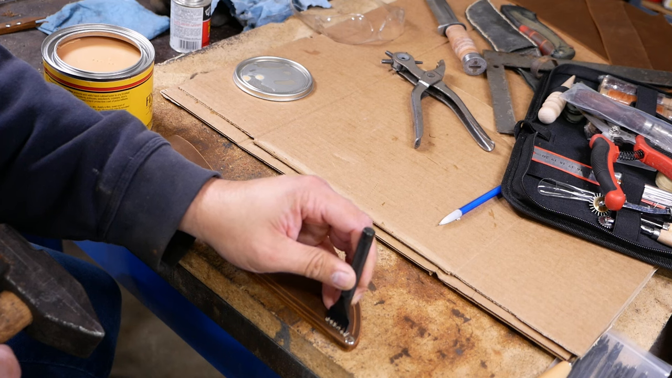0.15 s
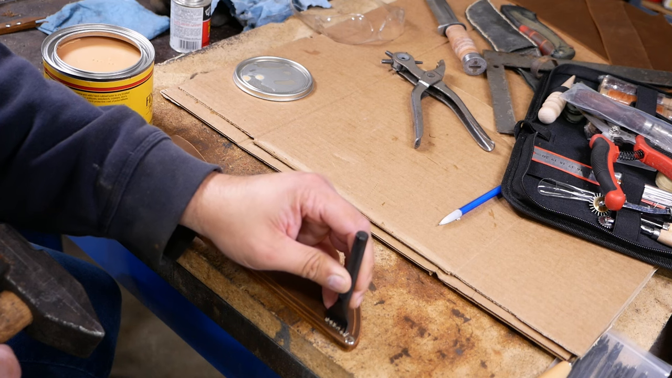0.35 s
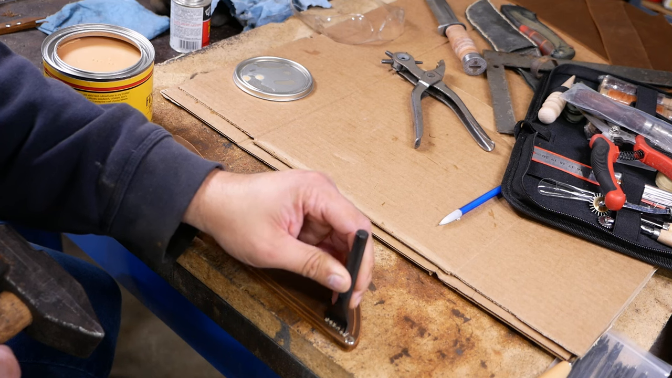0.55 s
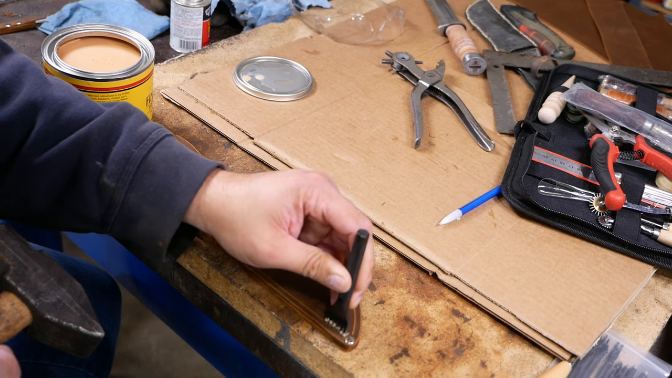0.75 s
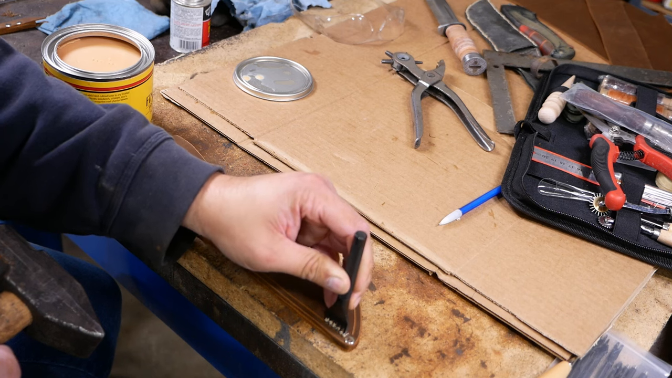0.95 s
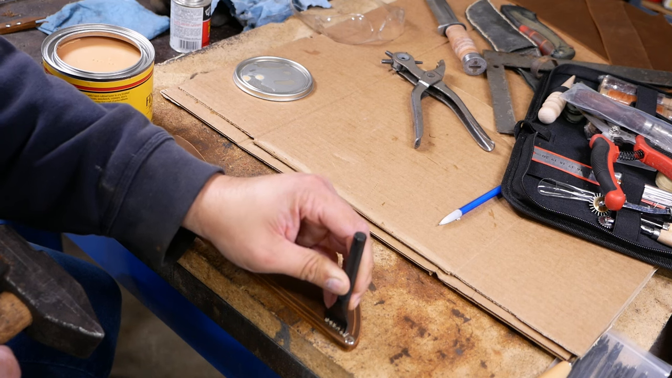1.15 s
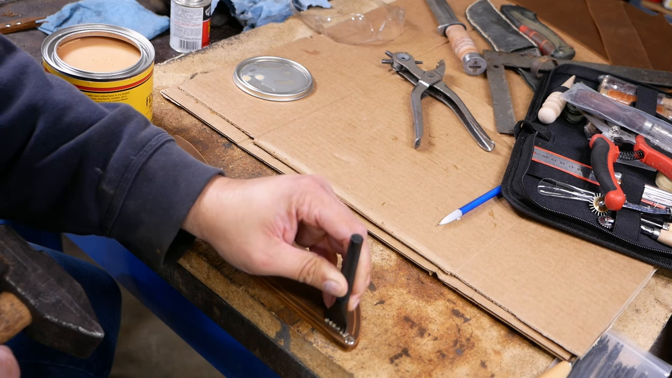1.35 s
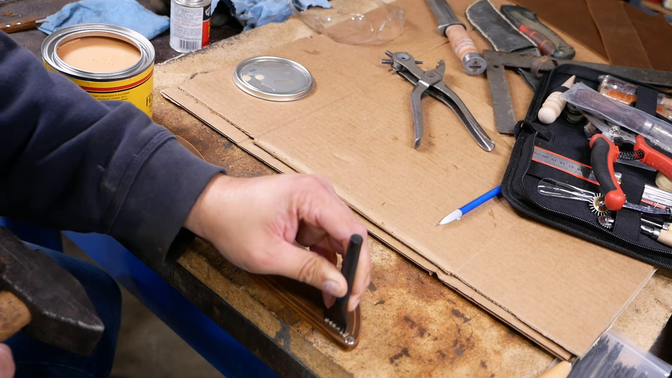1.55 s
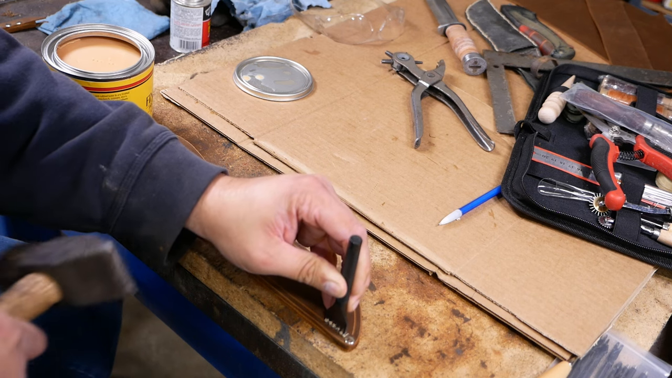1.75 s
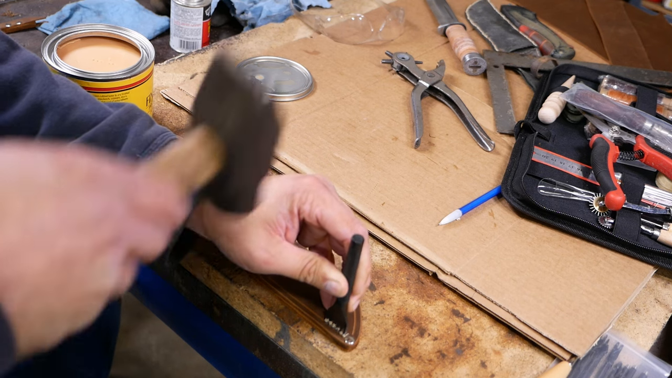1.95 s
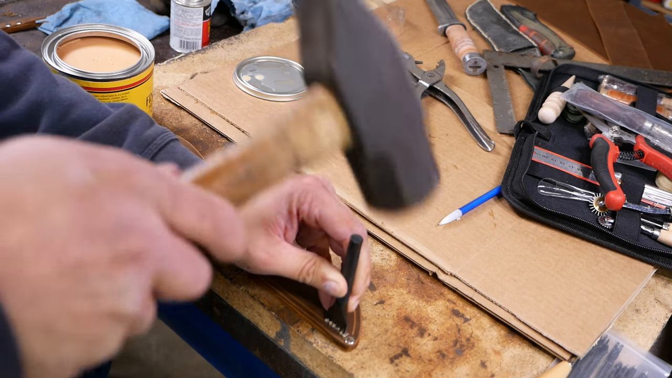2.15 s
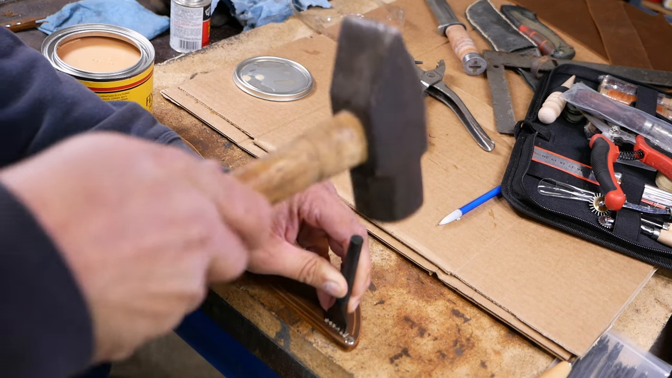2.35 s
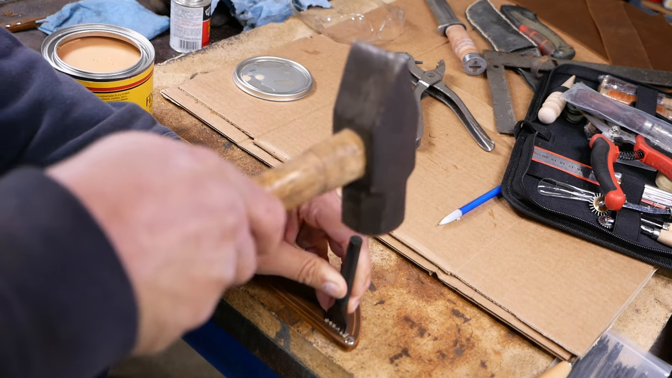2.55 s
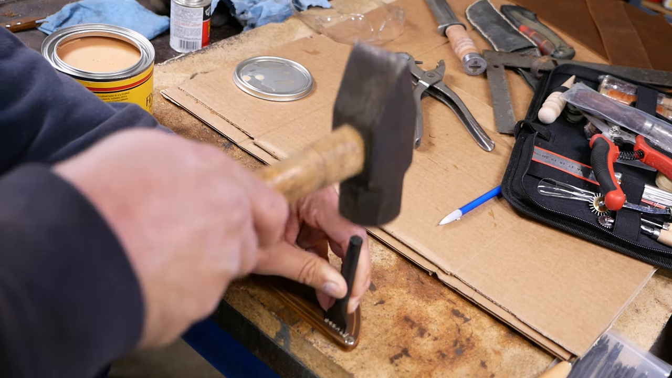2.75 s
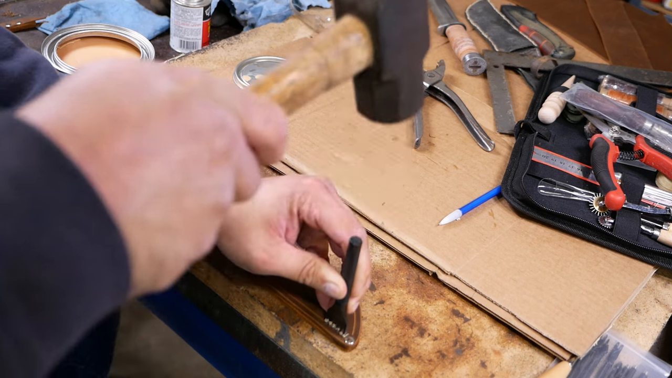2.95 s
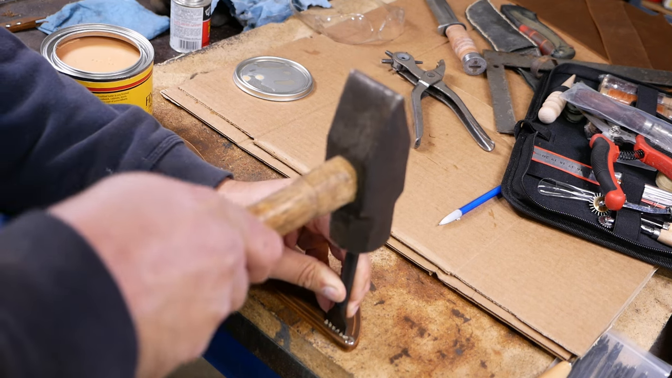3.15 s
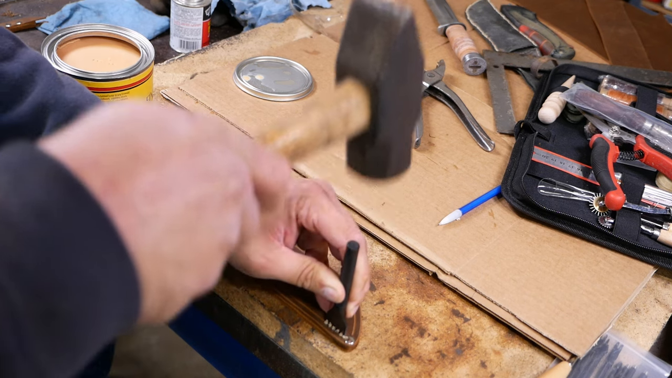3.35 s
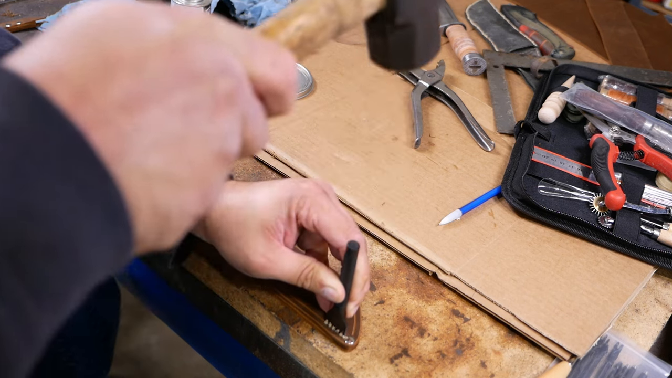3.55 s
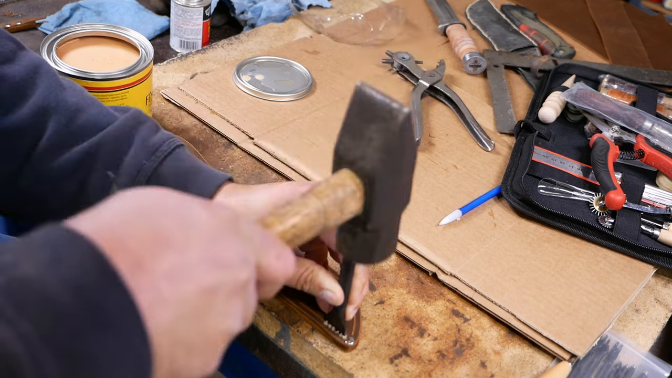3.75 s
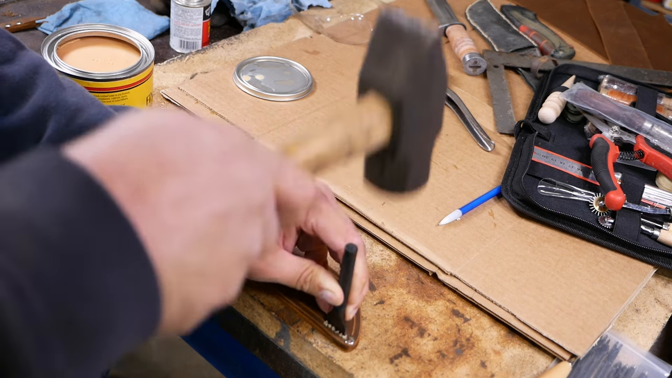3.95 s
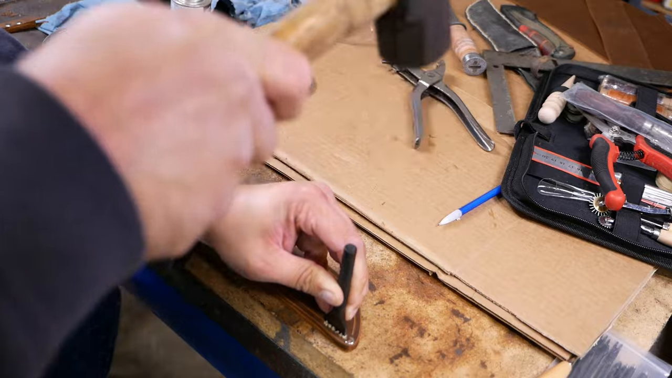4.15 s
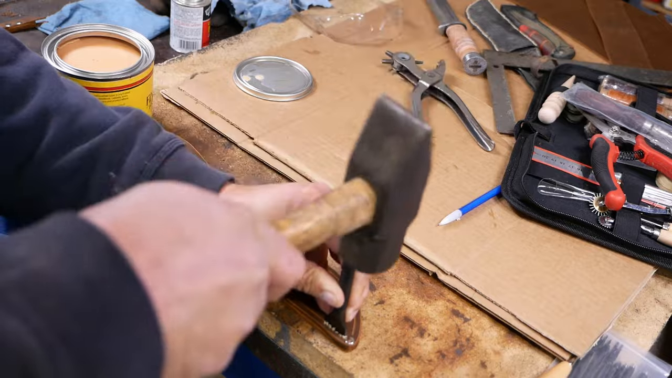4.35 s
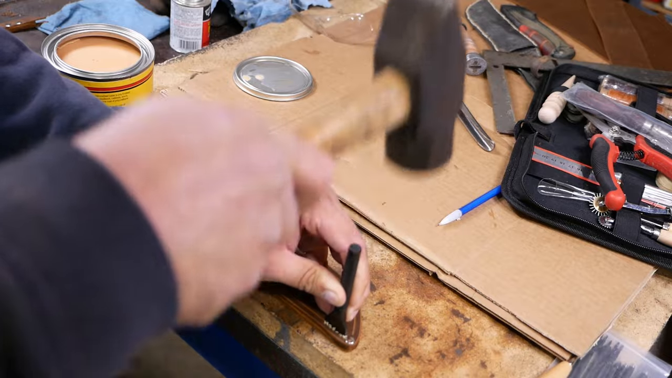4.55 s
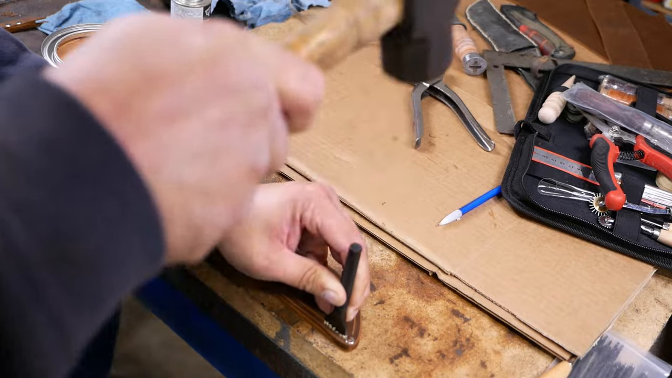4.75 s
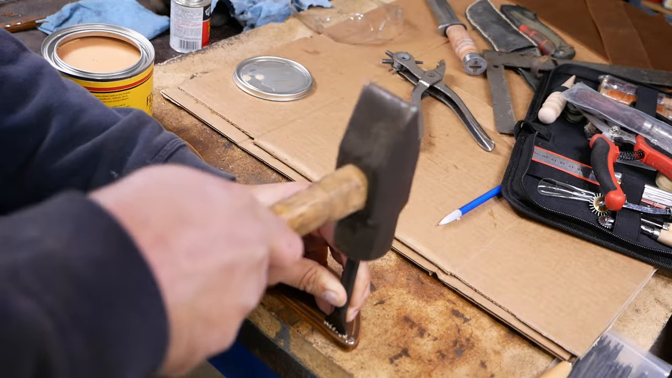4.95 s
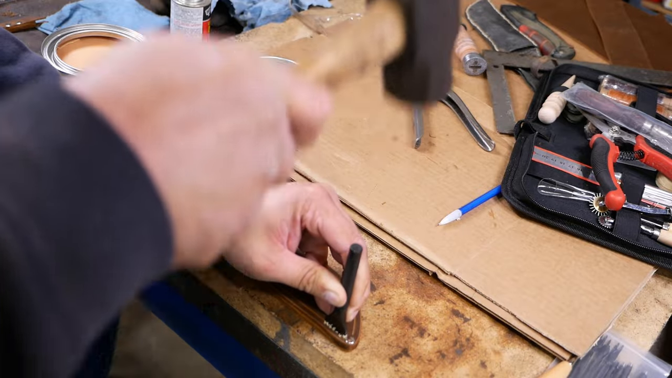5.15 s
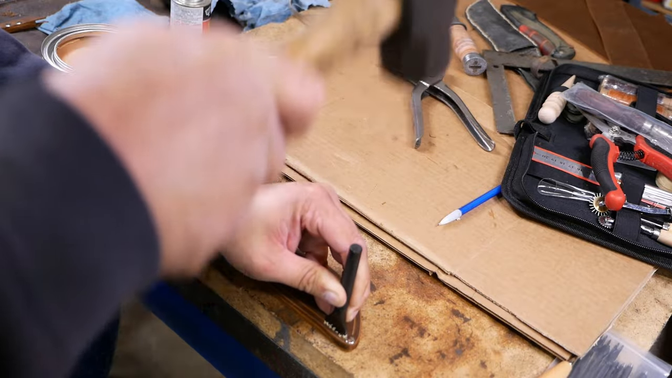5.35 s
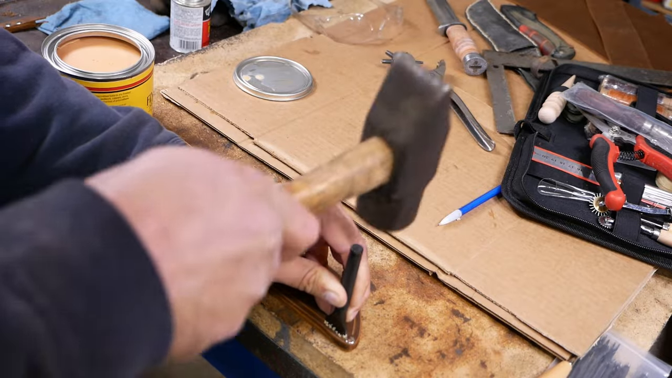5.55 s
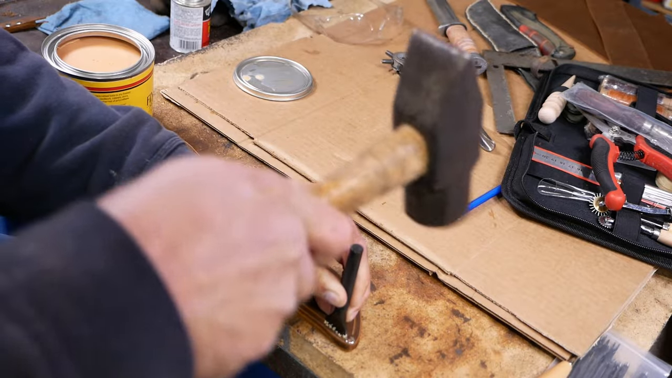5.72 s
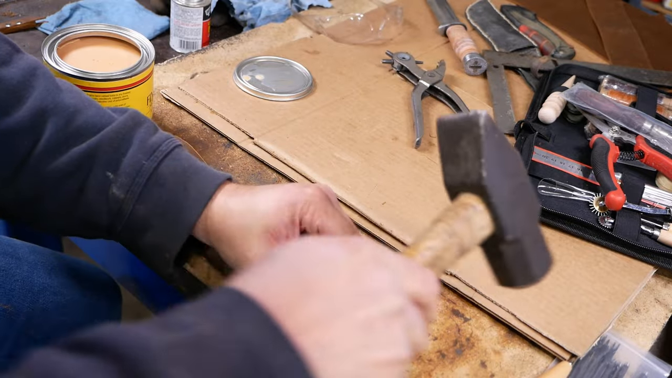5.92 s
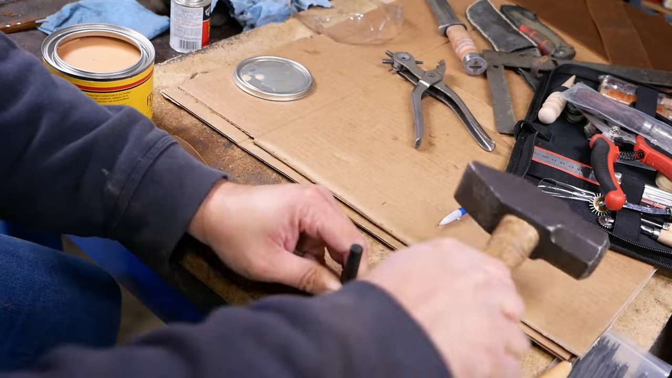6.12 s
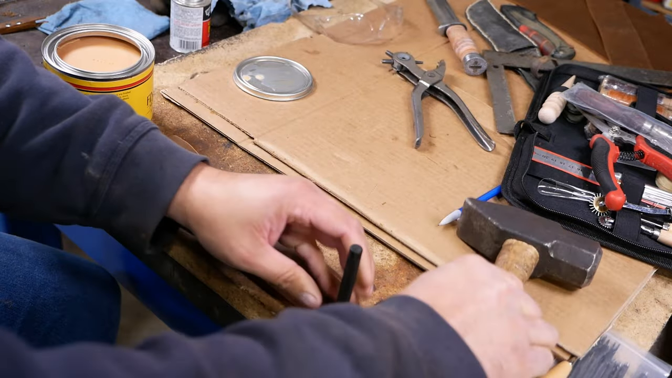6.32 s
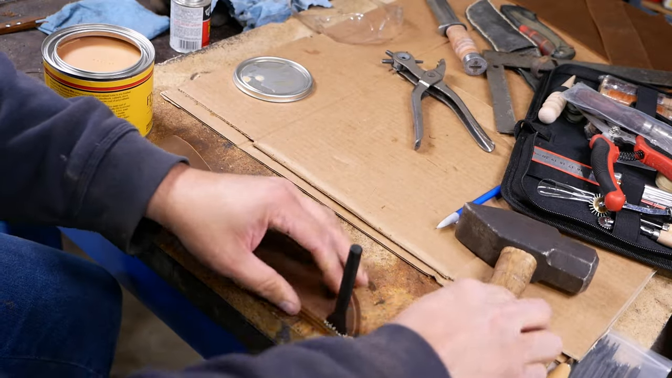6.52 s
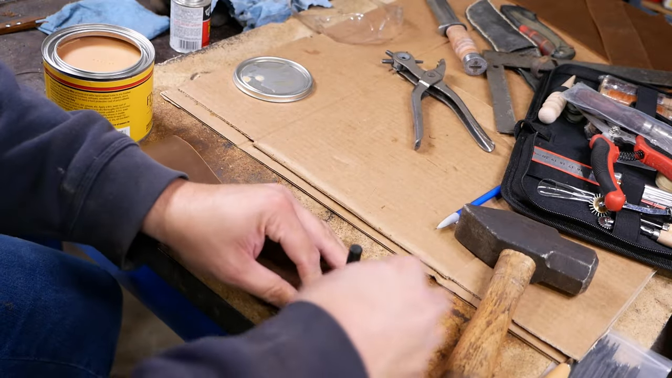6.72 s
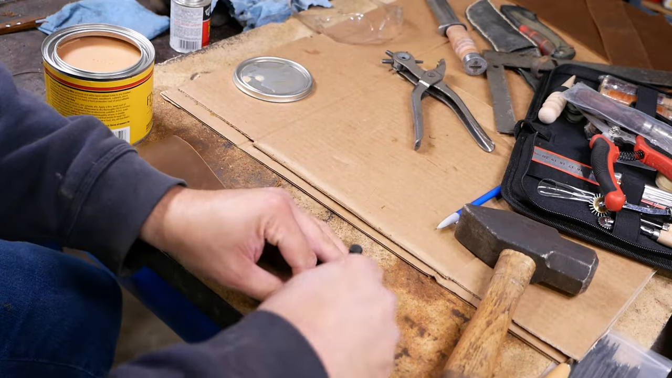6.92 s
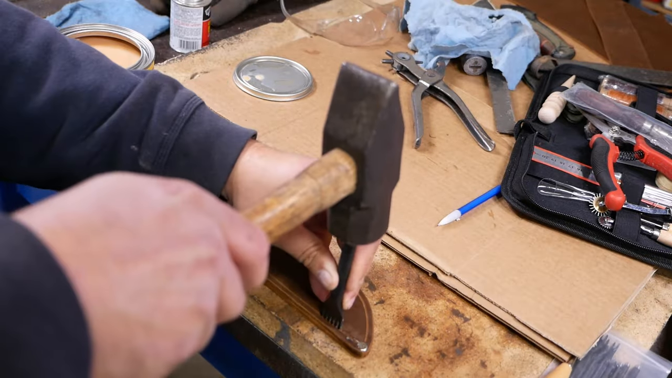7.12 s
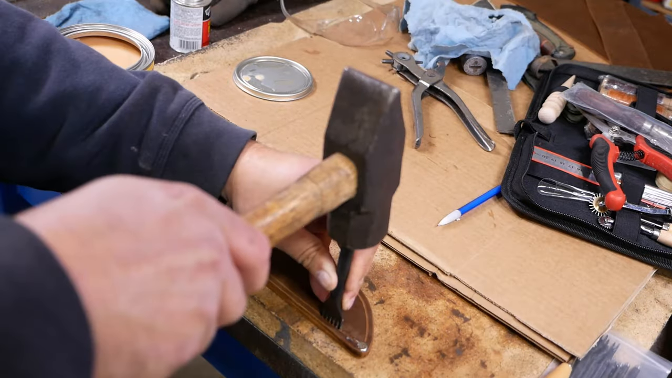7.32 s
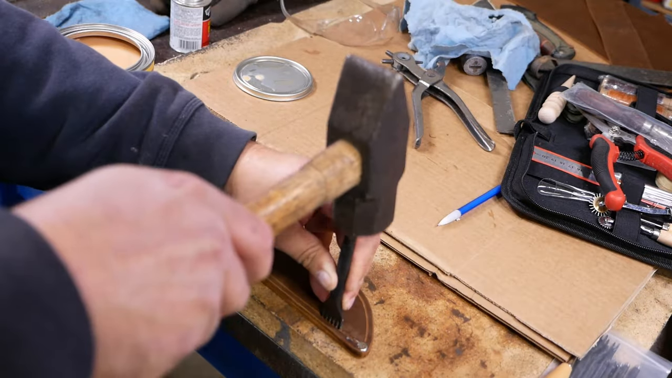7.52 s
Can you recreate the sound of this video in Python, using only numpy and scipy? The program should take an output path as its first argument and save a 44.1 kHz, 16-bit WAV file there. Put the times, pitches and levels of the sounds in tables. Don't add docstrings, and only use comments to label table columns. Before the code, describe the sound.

Five heavy hammer blows ring on a steel chisel over a wooden bench, each swelling into a long hall echo, then the hammer is laid down.

```python
import sys
import numpy as np
from scipy import signal
from scipy.fft import rfft, irfft
from scipy.io import wavfile
from scipy.ndimage import uniform_filter1d

SR = 44100
rng = np.random.default_rng(int(sys.argv[2]) if len(sys.argv) > 2 else 0)


def invert_db(level):
    return 10 ** (np.asarray(level, dtype=float) / 20)


def pcm_store(signal):
    levels = np.round(np.clip(np.atleast_2d(signal), -1, 1) * 32767)
    wavfile.write(sys.argv[1], SR, levels.astype(np.int16).T)


N = 338688
CLOCK = np.arange(N) / SR
SCENE_CHANGE_S = 7.023

# pitch_hz, level_db per Hz
AIR_COLOUR = [(12, -53.5), (20, -1.5), (77, -4.5), (113, -6), (134, -16), (204, -18.5), (222, -21),
              (248, -21.5), (485, -24), (574, -25.5), (624, -24), (1090, -24), (2460, -36), (14700, -45.5),
              (16000, -44.5)]
# pitch_hz, level_db per Hz
CLOTH_COLOUR = [(880, -33.5), (1500, -4), (1700, -16.5), (2070, -3.5), (2420, -2.5), (3030, -2),
                (3480, -4.5), (7980, -5), (15500, -23.5)]
# time_s, hiss_db, body_db
RUSTLE_STROKES = [
    [(.3, -63, -15), (.6, -89, -3)],
    [(6.365, -50.5, 6), (6.41, -48, 15), (6.47, -48.5, 4), (6.52, -51, -4), (6.608, -61, -3)],
    [(5.8, -70, -13), (6.1, -58, -11), (6.36, -67, -10)],
    [(7.5, -85, -2.5), (7.68, -60, -7)],
]
# time_s, level_db
ARM_RAISE = [(1.5, -81), (1.59, -56.5), (1.7, -55), (1.85, -56.5), (1.92, -46.5), (2.08, -57.5),
             (2.4, -59.5), (2.75, -68), (3.1, -64.5)]
# crest_s, level_db, rise_s, fall_s, fold_hz (rise and fall span 20 dB)
SLEEVE_TUGS = [(0.54, -57, .06, .03, 1150), (0.318, -57, .004, .08, 3000),
               (1.704, -48.5, 0.089, 0.046, 3420), (1.903, -44.5, 0.0093, 0.011, 3050),
               (2.111, -47, 0.13, 0.028, 2900), (2.183, -41.5, 0.03, 0.039, 2880),
               (2.246, -41.5, 0.01, 0.1, 2120)]
# start_s, body_db, body_hz, crack_db
PRONG_SEATING = [(0.314, -47, 2080, -54), (1.222, -52, 2090, -59), (1.589, -48, 2160, -56),
                 (1.8995, -46, 3060, -40), (1.726, -47, 1050, -55), (2.243, -43, 2120, -38)]
# start_s,
# body_db, body_hz, crack_db
WOOD_TOUCHES = [(0.54, -56, 1200, -66), (2.342, -58, 1100, -59), (2.3645, -54, 2600, -47),
                (2.388, -60, 1110, -55), (4.9995, -21, 790, -32.5), (4.999, -28.5, 2300, -50),
                (5.0003, -22, 380, -50), (7.266, -30, 940, -38.5), (7.306, -43, 1600, -61),
                (7.308, -39, 940, -64), (3.443, -25, 910, -50)]
# start_s, body_db, body_hz, crack_db
HEAD_REBOUNDS = [
    (3.797, -33, 6200, -56),
    (3.8005, -41, 7800, -55),
    (3.8196, -19.5, 395, -23.5),
    (4.3405, -43, 8000, -43),
    (4.3759, -18, 353, -29),
    (5.5055, -24, 905, -39),
]
# start_s, body_db, body_hz, crack_db
CARDBOARD_SCUFFS = [(6.3742, -28, 900, -38), (6.3917, -36, 3000, -49), (6.3945, -22.5, 1180, -50),
                    (6.4074, -26, 1700, -51), (6.4098, -24, 1700, -49), (6.4184, -26, 1500, -53),
                    (6.4276, -21, 1500, -36), (6.4575, -29, 1000, -39), (6.473, -46, 2000, -34),
                    (6.4975, -45, 3000, -52), (6.5066, -36.5, 2980, -56), (6.639, -28, 1000, -60)]
# crack_hz, length_s
CONTACT_KINDS = [(5200, 0.0116), (4370, 0.0059), (7461, 0.0038), (6500, 0.0025)]
# start_s, level_db
HANDLE_ROCKS = [(2.3435, -39), (2.3652, -33), (2.3805, -44), (2.3845, -44)]
# pitch_hz, level_db, t60_s
HANDLE_ROCK_MODES = [(1150, 0, .028), (420, -8, .02)]
# start_s, thud_db, knock_db, steel_db, gain_dive_db
HAMMER_BLOWS = [
    (3.1545, -8, -5.5, 13, 18.5),
    (3.7724, -7.5, -3, 7, 23.5),
    (4.3305, -3, 0, 10, 24.5),
    (4.924, -2, -0.5, 12, 22.5),
    (5.4959, -21, -0.5, 7.5, 19.5),
]
# pitch_hz, width_hz, level_db
STEEL_PEAKS = [
    [(3650, 240, -8), (4380, 140, -12.5), (5130, 160, -9), (5570, 170, -11), (6920, 350, -4),
     (8620, 530, 1.5), (10100, 230, -10.5), (11800, 290, -10.5), (12600, 170, -18.5), (14100, 290, -11),
     (15500, 260, -22)],
    [(4260, 200, -5), (4940, 180, -4), (6200, 190, -6.5), (7270, 180, -1), (7800, 340, 2), (9000, 280, -7),
     (9760, 120, -13), (11800, 400, -12.5), (12000, 140, -12.5), (13100, 280, -12), (14200, 310, -3.5)],
    [(4410, 110, -7), (5000, 170, -1), (7440, 240, -8.5), (7900, 100, -8.5), (8260, 630, -7.5),
     (9470, 500, -7), (10300, 120, -14.5), (12600, 190, -15), (13100, 210, -15.5), (14900, 170, -17),
     (15600, 160, -20)],
    [(4420, 110, 1), (5650, 97, -6.5), (7300, 100, -5), (7800, 87, -3), (9040, 230, -5.5), (9800, 98, -6),
     (10800, 94, -15), (12400, 180, -12), (12800, 180, -13.5), (14100, 120, -17.5), (14900, 110, -18)],
    [(4580, 130, 0.5), (4880, 120, 0.5), (5740, 140, -2), (7320, 230, -8), (7860, 130, -10),
     (9450, 110, -11), (10700, 200, -13.5), (11300, 94, -19), (11800, 160, -16), (13900, 160, -18.5),
     (15300, 210, -16.5)],
]
# pitch_hz, level_db, t60_s
BENCH_MODES = [(129, -15, 0.24), (232, -7.5, 0.13), (454, -12.5, 0.092)]
# pitch_hz, level_db, t60_s
BOARD_MODES = [(613, -7, 0.11), (655, -8.5, 0.081), (783, -1, 0.035), (922, -3.5, 0.038),
               (1100, -6.5, 0.086), (1330, -10, 0.038), (1680, -6, 0.03), (1910, -13.5, .018),
               (2266, -11.5, 0.042), (2650, -3.5, 0.024), (3014, -7, 0.0039), (3530, -13, 0.0089)]
# pitch_hz, level_db, t60_s
BLOW_BOARD_MODES = [
    [(316, -3, 0.062), (620, -13, 0.033), (1570, 3.5, 0.016), (2600, -9, 0.013), (1360, -7.5, .02),
     (2990, -9.5, 0.013)],
    [(332, 0, 0.054), (710, -10.5, 0.044), (1100, -5.5, 0.017), (1850, 3, 0.014), (2210, -2, 0.018),
     (2980, -7.5, 0.0098), (3300, -4.5, 0.014)],
    [(356, 2, 0.046), (795, 2.5, 0.03), (1090, 2, 0.03), (2600, 0.5, 0.014), (3440, 1.5, 0.013),
     (1730, -10, .015), (1960, -7.5, .02), (3000, -6, 0.016)],
    [(336.3, -2.5, 0.059), (790, -2, 0.039), (1100, -6, 0.04), (1600, -9, 0.021), (2620, -10.5, 0.021),
     (2050, -10, .02), (3270, -4, .01)],
    [(328, -5.5, 0.082), (780, 7.5, 0.018), (1080, -1, .04), (2210, -3.5, .025), (2760, -3.5, 0.032),
     (1630, -5, .015), (3500, -7, .012)],
]
# pitch_hz, width_hz, level_db
ECHO_GAPS = [
    [(4255, 89, -1), (6160, 260, -13), (7500, 240, -15.5), (9690, 150, -8), (10020, 150, 0.5),
     (10465, 150, -13), (11760, 90, -13), (12700, 300, -17.5), (14210, 200, -17.5)],
    [(5600, 170, -6.5), (8000, 300, 3), (8590, 120, -7.5), (9390, 150, -19), (10465, 100, -7),
     (12000, 250, 7.5), (12620, 160, -19), (13135, 120, -9), (13970, 400, 9.5)],
    [(4170, 300, -7), (6600, 820, -3), (7800, 350, 5), (9100, 150, -7.5), (10250, 200, 7),
     (10850, 140, -12), (11600, 70, 10.5), (12060, 260, -20.5), (12950, 300, 7), (13400, 98, -9),
     (13820, 70, 7.5), (14040, 130, -18.5)],
    [(4330, 84, -2), (6500, 500, -7.5), (9216, 90, 6.5), (9905, 140, -16.5), (10120, 60, 6.5),
     (10465, 170, -7), (11540, 70, 12.5), (12400, 480, 6), (13600, 200, -8.5)],
    [(8000, 160, -4.5), (9000, 500, 6), (9560, 70, 13.5), (11500, 90, 10.5), (10300, 200, -9.5),
     (12000, 3100, 4), (13830, 70, 9), (14350, 130, 6.5)],
    [(2710, 33, 14), (246, 6.6, -3), (6416, 46, 14), (11600, 50, 13)],
]
TOOL_RATTLE_DB = [-12, -12, -14.5, -8, -13.5]
WALL_SHEEN_DB = [-23, -25, -24.5, -27, -27]
# pitch_hz, level_db per Hz
BLOW_1_ECHO = [(53, -47.5), (90, -15), (122, -7.5), (161, -16.5), (389, -1.5), (473, -9.5), (653, -4),
               (1190, -10), (1550, -9), (2090, -25), (2770, -19.5), (4350, -31.5), (5390, -22),
               (6140, -25.5), (15500, -54.5)]
BLOW_2_ECHO = [(53, -50.5), (90, -29), (130, -12.5), (218, -15.5), (398, -3.5), (483, -11.5), (639, -5),
               (902, -4), (1190, -13), (2000, -8), (3290, -23.5), (4160, -23), (5390, -32), (6270, -25.5),
               (15500, -67.5)]
BLOW_3_ECHO = [(53, -54.5), (90, -30), (130, -11.5), (172, -11), (242, -10.5), (389, -5), (494, -10.5),
               (653, 0), (2830, -14), (4260, -22), (5170, -25), (7950, -37), (15500, -74)]
BLOW_4_ECHO = [(53, -61), (90, -30.5), (122, -16), (168, -14.5), (242, -9.5), (301, -11.5), (443, -5),
               (473, -14.5), (639, -4.5), (922, 1), (4840, -30.5), (7450, -36), (15500, -78.5)]
BLOW_5_ECHO = [(53, -69.5), (90, -35.5), (117, -20.5), (165, -17.5), (242, -9.5), (350, -11.5), (443, -6),
               (483, -17), (639, -4.5), (1100, -1.5), (1880, -11.5), (6550, -36.5), (15500, -76.5)]
LAID_ECHO = [(53, -68), (90, -34.5), (124, -18), (209, -15), (237, -3), (342, -5.5), (653, 1), (1300, -12),
             (1760, -15.5), (2050, -22), (2770, -26), (3820, -35), (15500, -53.5)]
ECHO_CREST_DB = [-28, -24, -22, -19.5, -19.5, -44]
# pitch_hz, t60_s
HALL_DECAY = [(100, 1), (300, 1.4), (1000, 1.99), (3000, 1.63), (7000, 0.81), (15000, 1.2)]
# pitch_hz, level_db over the echo colour, t60_s
STANDING_WAVES = [(133.8, -9, 0.73), (246, -6.5, 1.4), (429, -14.5, 1), (649, -14, 0.86), (1133, -16, 2.7),
                  (1406, -15, 1.4), (956, -11, 1.4)]
# start_s, level_db
SQUEAKS = [(6.538, -51.5), (6.556, -46), (6.578, -57)]
# pitch_hz, level_db, t60_s
SQUEAK_MODES = [(3820, 0, .04), (4480, 6, 0.055), (9150, 6, .05), (10800, -2, 0.045)]
# start_s, force_db, gain_dive_db
LAID_HAMMER = (6.6123, -13.5, 2.6)
# pitch_hz, level_db, t60_s
LAID_MODES = [(131.8, -14, 0.36), (272, 1, 0.114), (475, 7.5, 0.098), (667, 10, 0.037), (940, 5, 0.035),
              (1025, 1, 0.039), (1222, -5.5, 0.066), (1640, -3.5, 0.043), (1940, 1.5, 0.018),
              (2712, -3, 0.046), (4250, -41, .02), (7935, -54.5, .01)]
# start_s, level_db
LAST_TAP = (7.2665, -25.5)
# pitch_hz, level_db, t60_s
TAP_MODES = [(290, -30, 2.), (290, -12, .05), (390, -7, .05), (470, -14, .04), (580, -10, .03),
             (680, -5, .04), (920, -7, .04), (1170, -6, .025), (1650, -7, .04), (1760, -6, .03),
             (2240, -5, .04), (2300, -10, .04), (2262, -30, 1.1), (2330, -35, .6), (3030, -8, .018),
             (4150, -14, .012)]
DULL_MOMENTS = [.05, .1, .42, 1.02, 1.1, 1.14, 1.3, 1.44, 1.615, 1.725, 1.955, 2.62, 2.88, 2.93, 3.705,
                3.96, 4.025, 4.6, 4.8, 5.19, 5.24, 5.69, 5.755, 5.82, 6.27, 6.35, 6.52]


def shaped(points, size=N):
    hz, db = np.transpose(points)
    f = np.maximum(np.arange(size // 2 + 1) * SR / size, 1)
    gain = invert_db(np.interp(np.log(f), np.log(hz), db, left=-90))
    x = irfft(rfft(rng.standard_normal(size)) * gain, size)
    return x / np.std(x)


def bandpass(order, low_hz, high_hz, x):
    return signal.sosfilt(signal.butter(order, [low_hz, high_hz], "band", fs=SR, output="sos"), x)


def walk(rate):
    k = int(SR / rate)
    held = np.repeat(rng.standard_normal(N // k + 1), k)
    return 0.73 * uniform_filter1d(held, k)[:N]


def ring(modes, scatter_db=0.0, detune=0.0046, rise=0.00025):
    t = CLOCK[:SR // 2]
    hz, db, t60 = np.transpose(modes)[:, :, None]
    chance = rng.standard_normal((len(modes), 3)).T[:, :, None]
    wave = np.sin(2 * np.pi * hz * (1 + detune * chance[0]) * t + 0.66 * chance[2])
    decay = 1000 ** (-t / t60)
    attack = (1 - np.exp(-t / rise)) ** 2
    return np.sum(invert_db(db + scatter_db * chance[1]) * wave * decay, axis=0) * attack


def add(out, s, x):
    i = int(s * SR)
    out[i:i + len(x)] += x[:N - i]


def crack(length, hz, width=1.0):
    high_hz = min(hz * (1 + width), .45 * SR)
    noise = bandpass(2, hz / (1 + width), high_hz, rng.standard_normal(SR // 2))
    t = CLOCK[:SR // 2] / (0.22 * length)
    hump = t * np.exp(1 - t)
    return invert_db(-1.0) * noise * hump * np.linalg.norm(hump) / np.linalg.norm(noise * hump)


def room_air(quick, slow):
    floor = invert_db(-48 + 1.0 * walk(2.2)) * shaped(AIR_COLOUR)
    hiss = signal.sosfiltfilt(signal.butter(2, 2500, "high", fs=SR, output="sos"), floor)
    return quick ** .25 * slow * (floor - hiss) + quick ** .08 * hiss


def sleeves():
    arm_body_db, fold_db, fold_width = -3, -4, 0.057
    hiss = shaped(CLOTH_COLOUR) * invert_db(1.2 * walk(66) + 0.87 * walk(270))
    body_colour = [(120, -24.5), (220, -2.0), (400, -5.0), (1200, -6.5), (2000, -8.0),
                   (2600, -36.0), (20000, -70.5)]
    body = shaped(body_colour) * invert_db(2.2 * walk(40))
    arm_level = invert_db(np.interp(CLOCK, *np.transpose(ARM_RAISE), left=-120, right=-120))
    out = arm_level * (hiss + invert_db(arm_body_db) * body)
    for stroke in RUSTLE_STROKES:
        s, hiss_db, body_db = np.transpose(stroke)
        level = invert_db(np.interp(CLOCK, s, hiss_db, left=-120, right=-120))
        out += level * (hiss + invert_db(np.interp(CLOCK, s, body_db)) * body)
    for s, db, rise, fall, hz in SLEEVE_TUGS:
        fold = bandpass(2, hz / (1 + fold_width), hz * (1 + fold_width), rng.standard_normal(N))
        level = invert_db(db - 20 * np.where(CLOCK < s, (s - CLOCK) / rise, (CLOCK - s) / fall))
        out += level * (hiss + invert_db(fold_db) * fold / np.std(fold))
    return out


def small_contacts():
    out = np.zeros(N)
    kinds = (PRONG_SEATING, WOOD_TOUCHES, HEAD_REBOUNDS, CARDBOARD_SCUFFS)
    for kind, (crack_hz, length) in zip(kinds, CONTACT_KINDS):
        for s, body_db, body_hz, crack_db in kind:
            body_width = max(0.00077 / length, .11, 130 / body_hz)
            add(out, s, invert_db(crack_db) * crack(0.82 * length, crack_hz, 0.62))
            add(out, s + 0.1 * length, invert_db(body_db) * crack(1.56 * length, body_hz, body_width))
    return out


def handle_rocking():
    out = np.zeros(N)
    for s, db in HANDLE_ROCKS:
        add(out, s, invert_db(db) * ring(HANDLE_ROCK_MODES))
    return out


def steel(peaks):
    added_width_hz = 160
    modes = []
    for hz, width, db in peaks:
        damped_hz = width + added_width_hz
        modes.append((hz, db + 20 * np.log10(damped_hz / 600), 2.4 / damped_hz))
    return ring(modes, 0, 0, 0.00023)


def gaps(f, nulls):
    return invert_db(sum(gap_db * np.exp(-((f - hz) / width) ** 2) for hz, width, gap_db in nulls))


def gapped_noise(nulls):
    f = 2. * np.arange(SR // 4 + 1)
    return irfft(rfft(rng.standard_normal(SR // 2)) * gaps(f, nulls), SR // 2)


def rattle(nulls, db):
    hz, t60 = 8500, 0.1
    chatter = bandpass(3, 0.19 * hz, min(1.1 * hz, .45 * SR), gapped_noise(nulls))
    return invert_db(db) * chatter * 1000 ** (-CLOCK[:SR // 2] / t60)


def sheen(nulls, db):
    hz, t60 = 7500, .3
    t = CLOCK[:SR // 2]
    treble = bandpass(1, hz, 1.6 * hz, gapped_noise(nulls))
    return invert_db(db) * treble * 1000 ** (-t / t60) * (1 - np.exp(-t / .006))


def hammer_blows():
    out = np.zeros(N)
    force = -invert_db(4.5)
    details = zip(HAMMER_BLOWS, STEEL_PEAKS, BLOW_BOARD_MODES, ECHO_GAPS, WALL_SHEEN_DB, TOOL_RATTLE_DB)
    for blow, peaks, board, nulls, sheen_db, rattle_db in details:
        s, thud_db, knock_db, steel_db, _ = blow
        metal = steel(peaks) + invert_db(-11.5) * crack(0.0017, 5500)
        wood = ring(BOARD_MODES) + invert_db(-11.5) * crack(0.014, 1500)
        add(out, s, force * (invert_db(steel_db) * metal + invert_db(knock_db) * wood))
        add(out, s, force * ring(board, 0, 0, 0.00033))
        add(out, s, rattle(nulls, rattle_db) + sheen(nulls, sheen_db))
        add(out, s + 0.0016, force * invert_db(thud_db) * ring(BENCH_MODES, rise=0.0021))
    return out


def echo(colour, nulls, db):
    melt_s, melt_hz = .15, 8500
    f, t, z = signal.stft(shaped(colour, size=3 * SR), SR, nperseg=1024)
    hall_hz, hall_t60 = np.array(HALL_DECAY).T
    t60 = np.interp(np.log(f + 1), np.log(hall_hz), hall_t60)
    gap_gain = gaps(f, nulls)
    melts = (gap_gain > 1) & (f > melt_hz)
    strength = np.where(melts[:, None], np.exp(-t / melt_s), 1)
    decay = 1000 ** (-(t - .3) / t60[:, None])
    tail = signal.istft(z * gap_gain[:, None] ** strength * decay, SR)[1][:3 * SR]
    t = CLOCK[:3 * SR]
    for hz, mode_db, mode_t60 in STANDING_WAVES:
        level = invert_db(mode_db + np.interp(hz, *np.transpose(colour)))
        tail = tail + level * np.sin(2 * np.pi * hz * t) * 1000 ** (-(t - .3) / mode_t60)
    return invert_db(db) * tail * (1 - np.exp(-t / 0.0033))


def hall():
    out = np.zeros(N)
    times = [row[0] for row in HAMMER_BLOWS] + [LAID_HAMMER[0]]
    colours = (BLOW_1_ECHO, BLOW_2_ECHO, BLOW_3_ECHO, BLOW_4_ECHO, BLOW_5_ECHO, LAID_ECHO)
    for s, colour, nulls, db in zip(times, colours, ECHO_GAPS, ECHO_CREST_DB):
        add(out, s, echo(colour, nulls, db))
    return out * np.clip((SCENE_CHANGE_S - CLOCK) / 0.0088, 0, 1)


def rebound_knocks():
    out = np.zeros(N)
    for s, body_db, body_hz, _ in HEAD_REBOUNDS:
        if body_hz < 2000:
            knock = ring(BOARD_MODES, 3.5) * np.exp(-CLOCK[:SR // 2] / 0.0066)
            add(out, s, invert_db(body_db - 5) * knock)
    return out


def squeaks():
    out = np.zeros(N)
    for s, db in SQUEAKS:
        add(out, s, invert_db(db) * ring(SQUEAK_MODES, rise=0.0032))
    return out


def hammer_laid_down():
    out = np.zeros(N)
    s, force_db, _ = LAID_HAMMER
    body = ring(LAID_MODES, 0.37, 0.003, 0.00035)
    crunch = invert_db(-5.0) * crack(0.03, 386, 0.5) + invert_db(-12.5) * crack(0.0062, 2870, 0.3)
    add(out, s, invert_db(force_db) * (body + crunch))
    return out


def last_tap():
    out = np.zeros(N)
    s, db = LAST_TAP
    add(out, s, invert_db(db) * ring(TAP_MODES, 0.9, 0.0039, 0.00015))
    add(out, s, invert_db(db - 25) * crack(0.18, 1340, 0.47))
    return out


def gain_control():
    dive_s, climb_s, climb_bend = 0.0086, 0.31, 1.12
    slow_db, slow_s = 4, 3.6
    cut_db = np.zeros(N)
    for row in HAMMER_BLOWS + [LAID_HAMMER]:
        t = np.maximum(CLOCK - row[0], 0)
        climb = np.clip(1 - t / climb_s, 0, 1) ** climb_bend
        cut_db = np.maximum(cut_db, row[-1] * (1 - np.exp(-t / dive_s)) * climb)
    since = CLOCK[:, None] - np.array([row[0] for row in HAMMER_BLOWS])
    held = np.where(since > 0, np.exp(-(np.maximum(since, 0) / slow_s) ** 2), 0)
    slow = np.max(held, axis=1) * (CLOCK < SCENE_CHANGE_S)
    return invert_db(-cut_db), invert_db(-slow_db * slow)


def thin_treble(x):
    mask_db, scatter_db = -57, 10
    dull_db, spared_db, spared = -30, 3, .5
    top_band, top_db = 91, -14
    f, t, z = signal.stft(x, SR, nperseg=1024, noverlap=768)
    bands = (np.abs(z[:512]) ** 2).reshape(128, 4, -1).mean(axis=1)
    loudest = bands.max(axis=0)
    under_db = 10 * np.log10(bands / loudest + 1e-18)
    chance = uniform_filter1d(rng.standard_normal(bands.shape), size=18, axis=1) * 4.2
    keep = 1 / (1 + np.exp(np.clip(mask_db + scatter_db * chance - under_db, -30, 30)))
    keep[top_band:] = 0
    keep[:, loudest > .05 * bands.max()] = 1
    keep[top_band:] *= invert_db(top_db)
    keep[:20] = 1
    dull = np.min(np.abs(t[:, None] - np.array(DULL_MOMENTS)), axis=1) < .011
    escapes = chance < -spared * np.arange(128)[:, None] / 18
    keep[16:, dull] *= invert_db(np.where(escapes, spared_db, dull_db))[16:, dull]
    z[:512] *= np.repeat(keep, 4, axis=0)
    return signal.istft(z, SR, noverlap=768)[1][:N]


def scene():
    quick, slow = gain_control()
    air = room_air(quick, slow)
    cloth = sleeves()
    contacts = small_contacts() + handle_rocking() + rebound_knocks() + squeaks() + last_tap()
    knocks = hammer_blows() + hammer_laid_down() + hall()
    return (quick * knocks + air + contacts + cloth)[None]


def top_cut(x):
    return signal.sosfilt(signal.butter(12, 16410, fs=SR, output="sos"), x)


def record(dry):
    bass_cut = signal.sosfilt(signal.butter(2, 45, "high", fs=SR, output="sos"), dry)
    flat = np.clip(bass_cut, -.97, .97)
    flat = signal.sosfilt(signal.butter(1, 40, "high", fs=SR, output="sos"), flat)
    mix = thin_treble(flat[0])[None]
    return top_cut(mix)


dry = scene()
out = record(dry)
pcm_store(out)
```